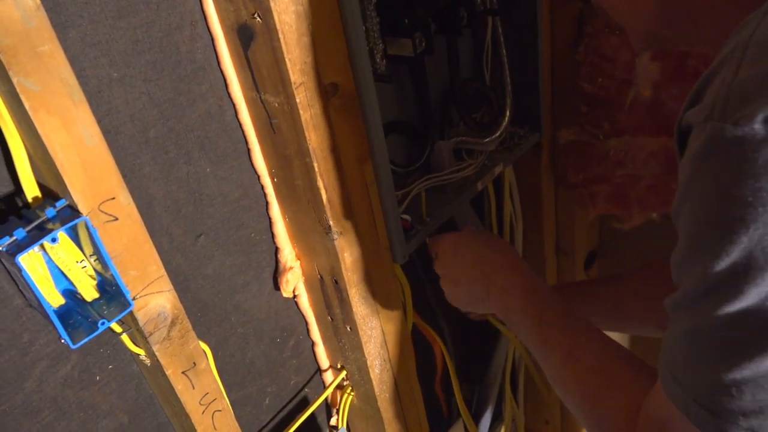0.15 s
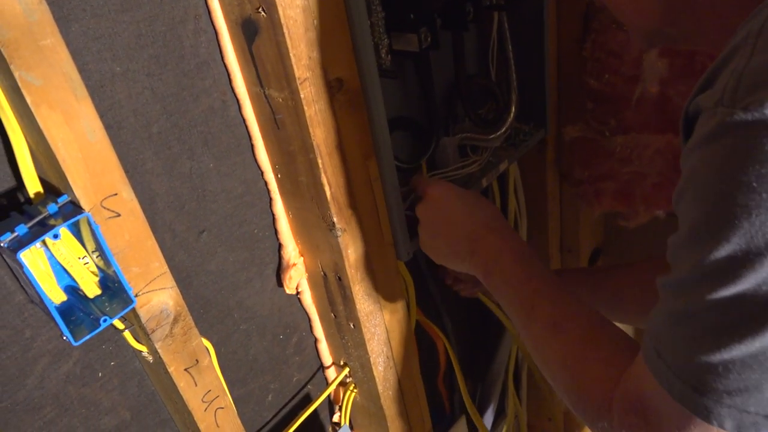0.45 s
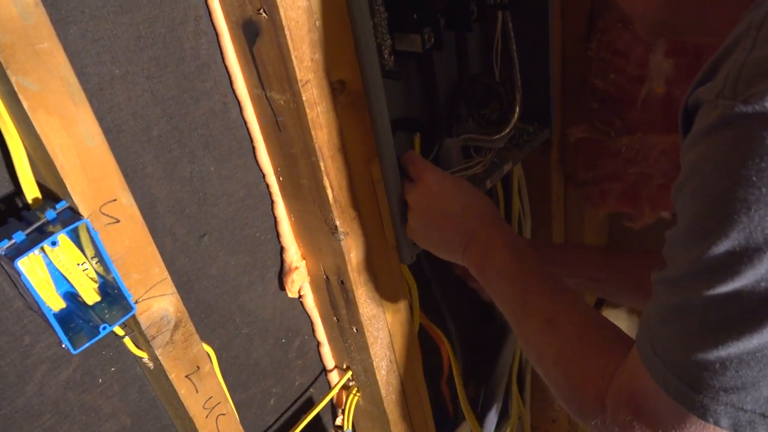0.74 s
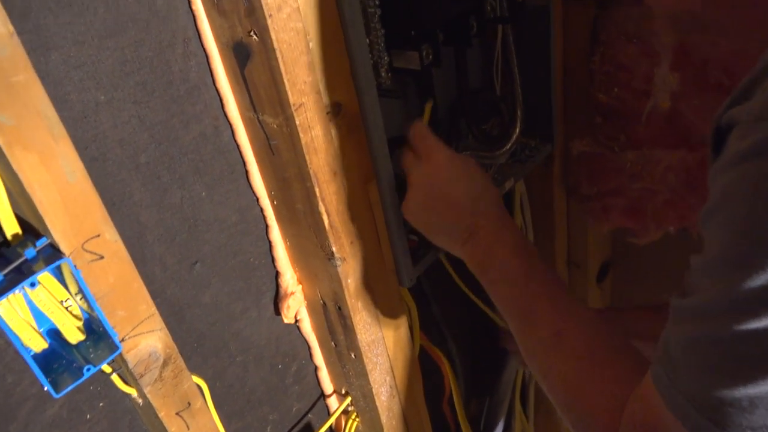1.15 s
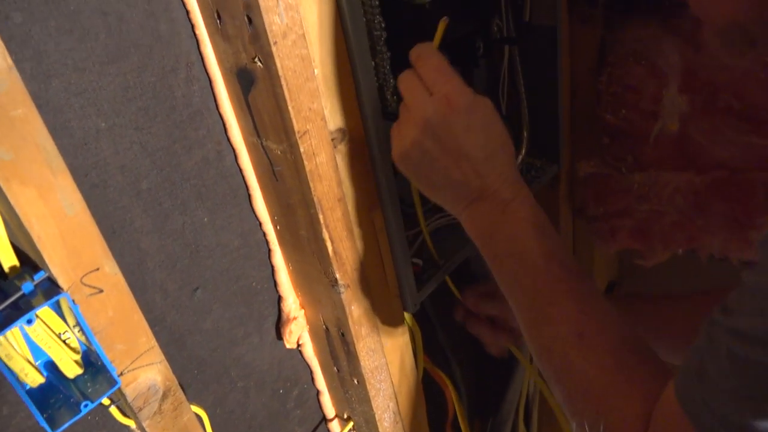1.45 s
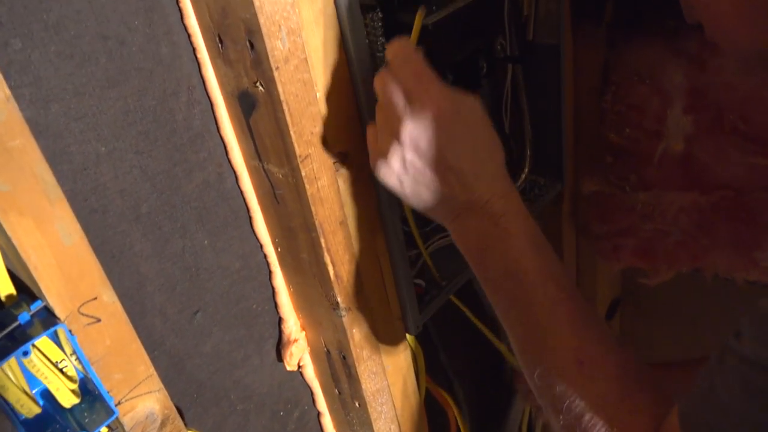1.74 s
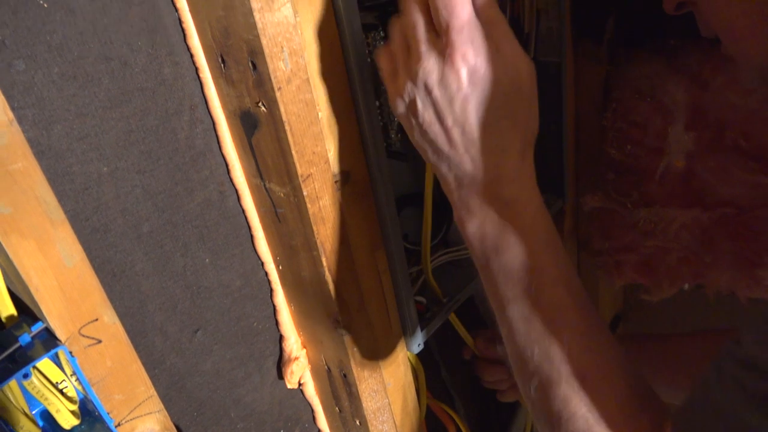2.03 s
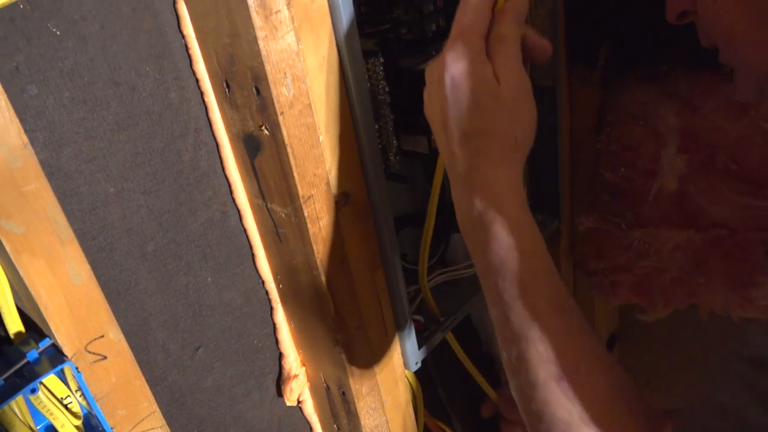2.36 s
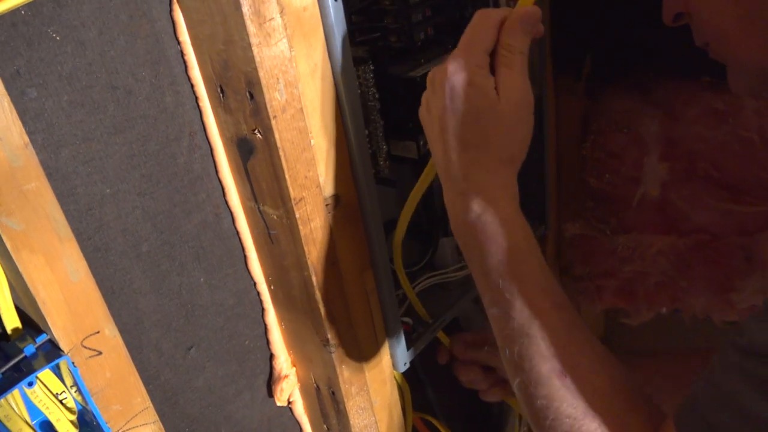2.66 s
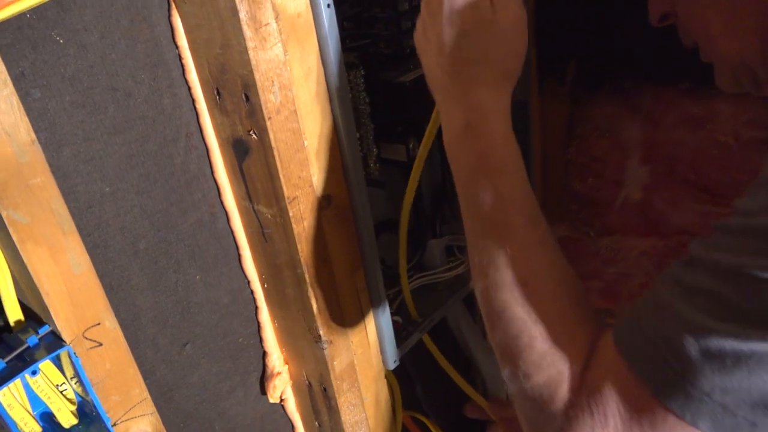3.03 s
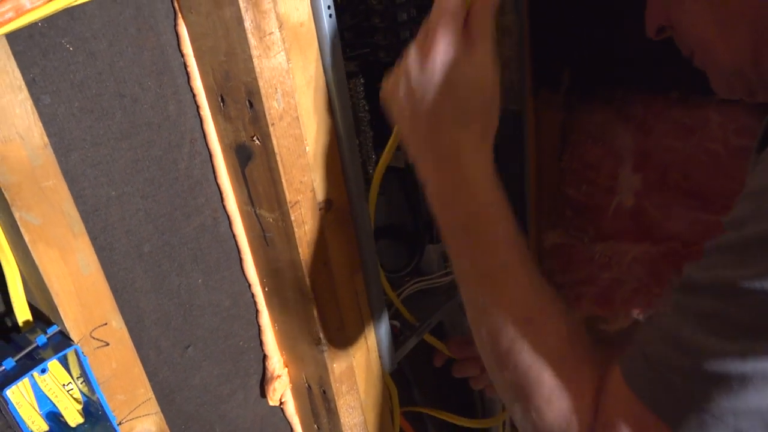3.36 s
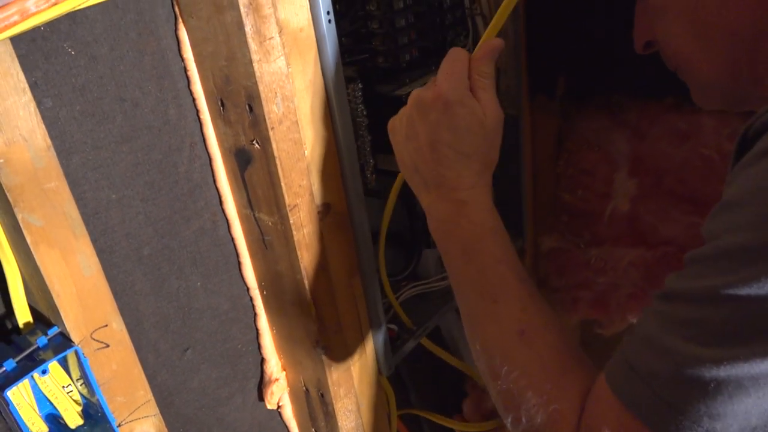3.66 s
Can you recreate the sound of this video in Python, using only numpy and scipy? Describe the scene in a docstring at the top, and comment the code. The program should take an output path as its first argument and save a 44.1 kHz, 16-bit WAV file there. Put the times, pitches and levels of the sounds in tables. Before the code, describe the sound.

Plastic-sheathed electrical cable scrapes and judders through a metal connector into a steel panel in short pulls.

```python
"""Pulling a cable into a steel panel

A plastic-sheathed cable is worked through a metal connector into a steel panel in an unfinished room.
Its wire ends tick (short noise cracks plus ringing tones), then several pulls haul it in: rubbing noise passes
through the panel's resonances as drone, rasp and hiss, with brief squeaks, knocks, and bright noise bursts as it
snaps free. A hand slides along the sheath (soft high noise) over room rumble, a low hum and dull bumps."""
import sys
import numpy as np
from scipy import signal
from scipy.fft import rfft, irfft
from scipy.io import wavfile
from scipy.ndimage import uniform_filter1d

SR = 44100
rng = np.random.default_rng(int(sys.argv[2]) if len(sys.argv) > 2 else 0)


def bounce(signal):
    """Save signal as a 16-bit WAV file at the path given by the first command-line argument."""
    frames = np.transpose(np.atleast_2d(signal))
    limited = np.clip(frames, -1, 1)
    pcm = np.round(limited * 32767).astype(np.int16)
    wavfile.write(sys.argv[1], SR, pcm)


N = 167580
TIME = np.arange(N) / SR
SNAP_PATCHY_DB, SLIDE_PATCHY_DB = 3.5, 2  # how far narrow treble bands wander


def from_db(db):
    """Turn decibels into gain."""
    return 10 ** (np.asarray(db) / 20)


def rms_one(x):
    """Scale to an average (rms) level of 1."""
    return x / np.sqrt(np.mean(x ** 2) + 1e-20)


def noise():
    """White noise: all pitches equally strong."""
    return rng.standard_normal(N)


def colour(x, points, tilt_db=0):
    """Shape the spectrum along a smooth curve, tilted by tilt_db per octave; rms 1."""
    hz, db = np.transpose(points)
    octave = np.log2(np.maximum(np.arange(N // 2 + 1) * SR / N, 1))
    curve_db = np.interp(octave, np.log2(hz), db) + tilt_db * octave
    return rms_one(irfft(rfft(x) * from_db(curve_db), N))


def drift(rate_hz):
    """Random wandering with spread 1, smoothed above rate_hz."""
    r = np.exp(-2 * np.pi * rate_hz / SR)
    return rms_one(signal.lfilter([1], [1, -2 * r, r * r], noise()))


def cut(x, hz, kind):
    """Keep only the lows, the highs or a band; rms 1."""
    sos = signal.butter(4, hz, kind, fs=SR, output="sos")
    return rms_one(signal.sosfilt(sos, x))


def gains(rows):
    """Turn level curves into gains, faded out beyond their ends."""
    fade_s = .012
    time_s, *columns = np.transpose(rows)
    inside_s = np.minimum(TIME - time_s[0], time_s[-1] - TIME)
    gate = np.clip(1 + inside_s / fade_s, 0, 1)
    return np.array([gate * from_db(np.interp(TIME, time_s, db)) for db in columns])


def burst(peak_s, rise_s, t60_s):
    """Envelope that swells to its peak, then falls 60 dB in t60_s."""
    before = np.minimum(TIME - peak_s, 0)
    after = np.maximum(TIME - peak_s, 0)
    return np.exp(before * 2 / rise_s) * from_db(-60 * after / t60_s)


def resonate(x, peaks):
    """A metal part lifts its resonances out of whatever shakes it; rms 1."""
    for hz, width_hz, lift_db in peaks:
        r = np.exp(-np.pi * width_hz / SR)
        feedback = [1, -2 * r * np.cos(2 * np.pi * hz / SR), r * r]
        band = signal.lfilter([1, 0, -1], feedback, x) * (1 - r * r) / 2
        x = x + (from_db(lift_db) - 1) * band
    return rms_one(x)


def wander(x, depth_db, size=512, count=11):
    """As the contact shifts, narrow treble bands swell and sink on their own; rms 1."""
    full_depth_hz = 1300  # below this pitch the wandering shrinks
    hz, _, frames = signal.stft(x, SR, nperseg=size)
    patches = rng.standard_normal(frames.shape)
    for _ in range(2):
        patches = uniform_filter1d(patches, size=2, axis=0)  # across pitch
        patches = uniform_filter1d(patches, size=count, axis=1)  # across time
    share = np.minimum(hz / full_depth_hz, 1)[:, None] ** 2
    gain = from_db(depth_db * np.clip(rms_one(patches), -2, 2) * share)
    return rms_one(signal.istft(frames * gain, SR, nperseg=size)[1][:N])


def ring(start_s, db, hz, t60_s):
    """A fading tone, struck at each start with its own level."""
    clicks = np.full(N, 1e-18)
    clicks[(start_s * SR).astype(int)] = from_db(db)
    r = np.exp(-np.log(1000) / (t60_s * SR))
    w = 2 * np.pi * hz / SR
    return signal.lfilter([0, np.sin(w)], [1, -2 * r * np.cos(w), r * r], clicks)


def friction():
    """Tiny slips at random moments and in random directions, on top of smooth rubbing."""
    slips_per_s, smooth_share = 900, 0.81
    slips = rng.random(N) < slips_per_s / SR
    return rms_one(slips * rng.choice([-1, 1], N)) + smooth_share * noise()


def background():
    """Room rumble and dull bumps from shaped noise, and mains hum from steady sines."""
    # spectrum of the room: pitch_hz, relative_db
    room_colour = [(12, -44), (20, 10.5), (67, -0.5), (138, -0.5), (228, -9.5), (642, -21.5), (897, -27),
                   (1330, -18.5), (3950, -26), (4670, -25), (8410, -26), (11400, -25), (16000, -31)]
    # mains hum: pitch_hz, rms_level_db
    hum_tones = [(60.5, -52.5), (119.5, -58.5)]
    # the cable bumps dully on the framing: time_s, level_db
    bump_levels = [(3.0, -69), (3.032, -85), (3.06, -39), (3.126, -36), (3.318, -48.5), (3.404, -45),
                   (3.588, -39.5), (3.8, -51.5)]
    # spectrum of the bumping: pitch_hz, relative_db
    bump_colour = [(40, -22), (80, -9), (125, 3), (220, -14.5), (400, -6.5), (700, -11.5)]
    room_db, bump_top_hz = -47.5, 854

    hum = np.zeros(N)
    for hz, db in hum_tones:
        hum += from_db(db) * np.sqrt(2) * np.sin(2 * np.pi * (hz * TIME + rng.random()))
    bumping = gains(bump_levels)[0] * cut(colour(noise(), bump_colour), bump_top_hz, "low")
    return from_db(room_db) * colour(noise(), room_colour) + hum + bumping


def scraping():
    """The sheath judders through the clamp: rubbing noise split into panel drone, rasp and hiss."""
    # the cable is nudged in: time_s, level_db (before the trims below)
    nudge_levels = [(0.0, -66), (0.008, -74), (0.198, -40), (0.33, -85), (0.344, -40), (0.41, -74),
                    (0.418, -51.5), (0.53, -42.5), (0.542, -43), (0.568, -38), (0.696, -53.5), (0.72, -47)]
    # the pulls: time_s, drone_db, rasp_db, hiss_db (before the trims below)
    first_pull = [(1.06, -90, -87, -73), (1.094, -48, -53.5, -78), (1.138, -21, -23.5, -32.5),
                  (1.144, -26, -21, -35), (1.156, -30.5, -28, -33), (1.182, -26, -19.5, -28),
                  (1.208, -23.5, -26.5, -33.5), (1.254, -20.5, -24, -29.5), (1.302, -36, -25, -26.5),
                  (1.32, -36, -19, -31.5), (1.336, -27.5, -27, -26.5), (1.354, -38, -34, -42),
                  (1.37, -39, -30, -36.5), (1.38, -39.5, -46, -43), (1.444, -28.5, -37, -43.5),
                  (1.458, -36, -51, -64), (1.476, -30.5, -53, -51), (1.492, -52, -45, -65),
                  (1.495, -54, -55, -58)]
    second_pull = [(1.75, -86, -76, -71), (1.766, -39, -73, -75), (1.774, -45, -42, -55),
                   (1.836, -35, -49, -51), (1.852, -32, -27.5, -32), (1.916, -33.5, -32.5, -33.5),
                   (1.946, -38, -34.5, -38.5), (1.968, -35, -29, -37.5), (2.038, -36, -37.5, -44),
                   (2.056, -39, -45.5, -49), (2.084, -51.5, -55, -75), (2.15, -78, -87, -81)]
    take_up = [(2.435, -44, -33, -41), (2.449, -37.5, -43, -59), (2.521, -44, -47, -61),
               (2.572, -33, -30, -58)]
    third_pull = [(2.59, -34, -24, -37), (2.598, -35, -23.5, -26.5), (2.632, -46, -45, -56),
                  (2.684, -28, -29, -51), (2.732, -62, -68, -77), (2.746, -57, -66, -73),
                  (2.754, -39, -51, -62), (2.786, -60, -45.5, -48), (2.85, -75, -77, -69)]
    last_pull = [(3.03, -81, -78, -73), (3.044, -62, -63, -75), (3.06, -29, -27, -44),
                 (3.07, -30, -24.5, -35), (3.102, -37, -19.5, -30.5), (3.122, -29, -26, -43),
                 (3.136, -11.5, -29, -33), (3.152, -33, -32, -39), (3.168, -22.5, -31, -37.5),
                 (3.202, -36.5, -35, -33.5), (3.224, -23, -28.5, -35), (3.242, -29.5, -41, -35),
                 (3.288, -32.5, -40, -39.5), (3.326, -40, -45.5, -46.5), (3.384, -39, -53, -38),
                 (3.396, -25, -39, -36.5), (3.444, -40.5, -66, -44), (3.49, -94, -63, -46)]
    # spectrum of the rubbing: pitch_hz, relative_db
    rub_colour = [(100, -3), (220, -7), (330, -12.5), (600, 3), (900, -14), (1500, -3), (2500, -2.5),
                  (3800, -17.5), (5600, -14), (8200, -28), (10200, -21), (12500, -25.5), (15500, -38)]
    # resonances of the panel and clamp: pitch_hz, width_hz, lift_db
    panel = [(324, 18.7, 19.5), (454, 12.5, 12), (493.3, 15, 12.5), (617, 36, 8.5), (674.8, 37, 14.5),
             (798.5, 27.6, 19), (989, 34, 21.5), (1105, 21, 8), (1353, 27.6, 15), (1636, 35, 1),
             (1910, 53, 11), (2180, 71, 4), (2550, 54, 6.5), (3425, 106, 6), (4530, 53, 4.5),
             (5990, 130, 6)]
    judder_db, judder_hz, patchy_db = 0.16, 51, 3.6
    drone_trim_db, rasp_trim_db, hiss_trim_db, nudge_rasp_trim_db = -0.5, -2, -1.5, -10.5
    idle_panel_db = -57  # a faint drone that never stops

    pulls = (first_pull, second_pull, take_up, third_pull, last_pull)
    drone, rasp, hiss = sum(gains(pull) for pull in pulls)
    nudge = gains(nudge_levels)[0]
    rub = colour(friction() * from_db(judder_db * drift(judder_hz)), rub_colour)
    rub = wander(resonate(rub, panel), patchy_db)

    low_gain = from_db(drone_trim_db) * (drone + nudge) + from_db(idle_panel_db)
    middle_gain = from_db(rasp_trim_db) * rasp + from_db(nudge_rasp_trim_db) * nudge
    high_gain = from_db(hiss_trim_db) * hiss
    return (low_gain * cut(rub, 1200, "low")
            + middle_gain * cut(rub, [1200, 3900], "band")
            + high_gain * cut(rub, 3900, "high"))


def wire_ticks():
    """Wire ends hit metal: each tick is a short crack and a ring, a little different every time."""
    # ticks: start_s, crack_db, short_ring_db, long_ring_db
    ticks = [(.1238, -34, -25, -43), (.172, -28, -26, -30), (.1785, -32.5, -47, -50),
             (.2034, -30.5, -29.5, -55), (0.235, -36, -32.5, -58), (0.277, -34.5, -39, -59),
             (.306, -42, -46, -64), (.3326, -39, -38, -46), (.348, -37, -52, -58), (.374, -41, -36, -52),
             (.628, -38, -27, -55), (0.635, -28, -21, -35.5), (.647, -32.5, -44, -50)]
    # tones of the short ring: pitch_hz, relative_db, t60_s
    wire_modes = [(2174, -17, 0.17), (3247, -15.5, 0.044), (4740, -10, .04), (6070, -9, .04),
                  (7150, -11.5, 0.053), (11850, -1, 0.066), (12100, -21, .06), (13600, -18, 0.086)]
    # spectrum of the crack: pitch_hz, relative_db
    tick_colour = [(300, -17), (1200, -4.5), (2200, 7.5), (3500, -5.5), (5500, -1), (8000, -9),
                   (12000, -5.5), (15500, -35)]
    crack_rise_s, crack_t60_s, spread_db = 0.0014, 0.059, 1.5
    long_ring_hz, long_ring_t60_s = 9058, .15

    start_s, crack_db, short_db, long_db = np.transpose(ticks)
    level = sum(from_db(db) * burst(s, crack_rise_s, crack_t60_s) for s, db in zip(start_s, crack_db))
    out = level * wander(colour(noise(), tick_colour), SNAP_PATCHY_DB)
    for hz, db, t60_s in wire_modes:
        spread = rng.normal(0, spread_db, len(ticks))
        out += ring(start_s, short_db + db + spread, hz, t60_s)
    return out + ring(start_s, long_db, long_ring_hz, long_ring_t60_s)


def hand_slides():
    """Skin on plastic: a soft high hiss that swells and fades."""
    # slides: peak_s, rise_s, fall_s, level_db
    slides = [(.352, 0.014, 0.011, -43.5), (.53, .1, 0.085, -54.5), (.9, 0.1, 0.14, -41),
              (1.631, 0.065, 0.082, -38.5), (2.26, 0.11, 0.032, -53), (2.36, 0.042, 0.013, -52),
              (2.64, 0.1, 0.065, -37.5), (2.87, 0.099, .1, -47.5), (3.53, 0.12, 0.097, -43.5),
              (3.73, .13, 0.14, -43)]
    # spectrum of the hiss: pitch_hz, relative_db
    slide_colour = [(200, -8), (1200, -8.5), (3700, -9.5), (4700, -4), (5500, -1.5), (6400, -4.5),
                    (7400, -4.5), (9200, -7), (11300, 1), (13000, -4), (15500, -12)]
    edge = 2.4  # how abruptly a slide starts and stops: 2 is a soft bell
    flutter_db, flutter_hz = 1, 36

    level = np.zeros(N)
    for peak_s, rise_s, fall_s, db in slides:
        width_s = np.where(TIME < peak_s, rise_s, fall_s)
        level += from_db(db) * np.exp(-abs((TIME - peak_s) / width_s) ** edge)
    hiss = wander(colour(noise(), slide_colour), SLIDE_PATCHY_DB)
    return level * hiss * from_db(flutter_db * drift(flutter_hz))


def knocks():
    """The cable knocks the panel: dull noise bursts with the panel's low tones ringing."""
    # knocks: start_s, level_db
    blows = [(.727, -22), (1.135, -37), (2.751, -48), (3.132, -16), (3.394, -40)]
    # spectrum of the noise burst: pitch_hz, relative_db
    knock_colour = [(100, -26), (300, -7), (660, 11), (1000, -4.5), (2500, 2.5), (4500, -15.5),
                    (12000, -16.5), (15500, -43)]
    # tones of the panel: pitch_hz, relative_db, t60_s
    panel_modes = [(417, -19, 0.08), (619, -3.5, 0.087), (820, -15, 0.15), (1350, -21, .04)]
    crack_db, rise_s, crack_t60_s = -6, 0.0035, 0.075

    start_s, level_db = np.transpose(blows)
    level = sum(from_db(db + crack_db) * burst(s, rise_s, crack_t60_s) for s, db in blows)
    crack = level * colour(noise(), knock_colour)
    return crack + sum(ring(start_s, level_db + db, hz, t60_s) for hz, db, t60_s in panel_modes)


def snaps():
    """Bright dense cracks in the connector as the cable jumps free, each with a faint room tail."""
    # snaps: peak_s, level_db, rise_s, t60_s, tilt_db_per_octave (positive is brighter)
    jumps = [(1.142, -26.5, 0.0011, 0.023, 1), (1.366, -34.5, .004, 0.088, 1.5),
             (1.506, -13.5, 0.0049, 0.041, 2), (1.777, -39, .002, 0.074, -1.5),
             (1.848, -32.5, .002, 0.1, 1), (2.201, -39, .002, 0.049, -1), (2.424, -22.5, 0.0013, .06, -1.5),
             (2.4543, -25, 0.0017, 0.029, 6.5), (2.483, -38.5, 0.0044, .06, 2.5),
             (2.579, -11.5, 0.0024, 0.046, 0), (2.723, -29, 0.0022, 0.023, -3)]
    # spectrum before the tilt: pitch_hz, relative_db
    snap_colour = [(150, -9), (500, 1), (1300, -2), (2700, 0.5), (4000, -0.5), (5300, 0), (6600, -5),
                   (8600, -6), (11500, -6), (13500, -9.5), (15800, -20)]
    # resonances of the connector: pitch_hz, width_hz, lift_db
    connector = [(694, 110, 3), (1370, 140, 4.5), (1930, 62, 3), (2400, 67, 7.5), (2850, 90, 6.5),
                 (3476, 40, 11.5), (4675, 91, 9.5), (5450, 590, 0.5), (6280, 280, 6), (7400, 210, 5.5),
                 (9050, 160, 8), (11970, 180, 8.5)]
    tail_db, tail_t60_s = -22.5, 0.3

    crack = wander(resonate(noise(), connector), SNAP_PATCHY_DB)
    out = np.zeros(N)
    for peak_s, db, rise_s, t60_s, tilt_db in jumps:
        tail = from_db(tail_db) * burst(peak_s, rise_s, tail_t60_s)
        envelope = burst(peak_s, rise_s, t60_s) + tail
        out += from_db(db) * colour(crack, snap_colour, tilt_db) * envelope
    return out


def squeaks():
    """For a moment the slips lock on to one resonance: a short tone of unsteady pitch."""
    # squeaks of the sheath on the clamp: middle_s, length_s, pitch_hz, level_db
    tones = [(1.314, 0.018, 1873, -18), (2.598, 0.039, 1900, -20.5), (3.102, 0.02, 1868, -25)]
    wobble_share, wobble_hz = 0.031, 190

    out = np.zeros(N)
    for middle_s, length_s, hz, db in tones:
        pitch_hz = hz * (1 + wobble_share * drift(wobble_hz))
        phase = 2 * np.pi * np.cumsum(pitch_hz) / SR
        out += from_db(db) * np.sin(phase) * np.exp(-(2 * (TIME - middle_s) / length_s) ** 2)
    return out


def regrip():
    """The palm closes on the sheath with a short gritty scuff of friction noise."""
    # loudness of the scuff: time_s, level_db
    grip_levels = [(3.508, -46), (3.526, -39.5), (3.533, -36.5), (3.562, -36.5), (3.573, -34.5),
                   (3.585, -39)]
    # spectrum of the scuff: pitch_hz, relative_db
    grip_colour = [(100, -16), (380, 0), (800, -12), (1100, -10), (1550, 6.5), (1950, -7), (2500, -3),
                   (3100, -14), (3700, -8), (6000, -26), (8200, -9), (9500, -24), (13000, -17),
                   (15500, -25)]
    return gains(grip_levels)[0] * wander(colour(friction(), grip_colour), SLIDE_PATCHY_DB)


def scene():
    """Add all sources at one microphone."""
    handling = hand_slides() + regrip()
    metal = wire_ticks() + knocks() + snaps()
    return (background() + scraping() + squeaks() + metal + handling)[None]


def record(dry):
    """Cut the treble steeply above 16 kHz."""
    sos = signal.ellip(10, .1, 80, 16000, fs=SR, output="sos")
    return signal.sosfilt(sos, dry)


dry = scene()
out = record(dry)
bounce(out)
```